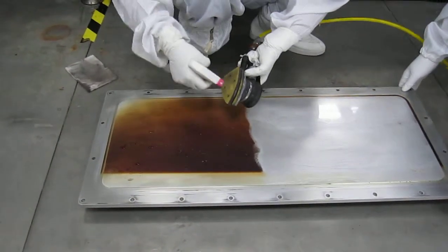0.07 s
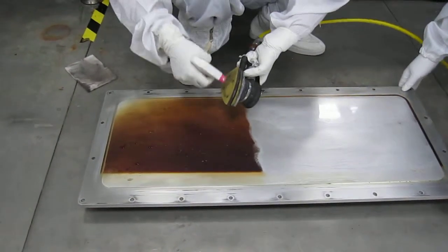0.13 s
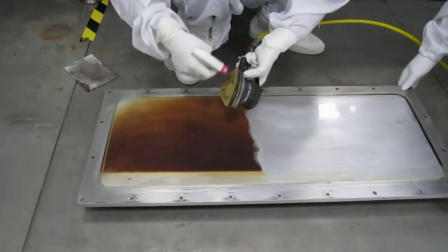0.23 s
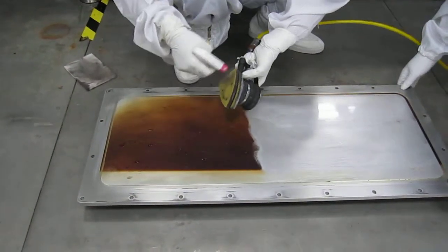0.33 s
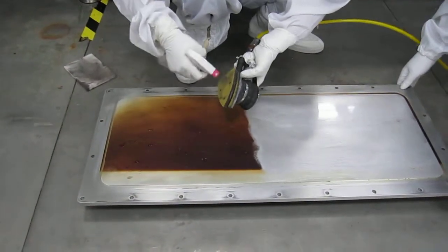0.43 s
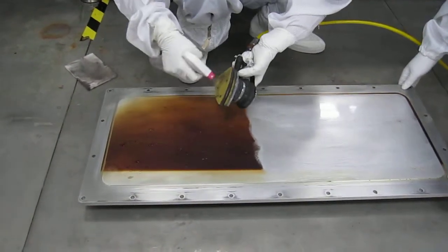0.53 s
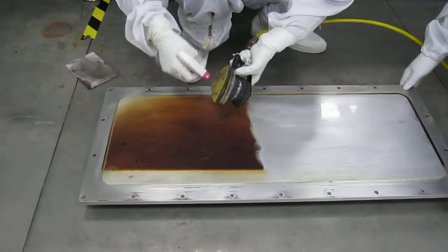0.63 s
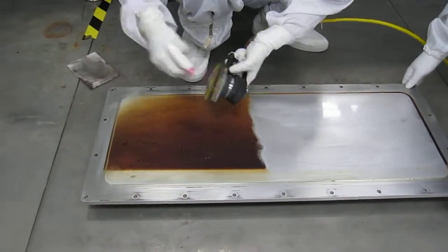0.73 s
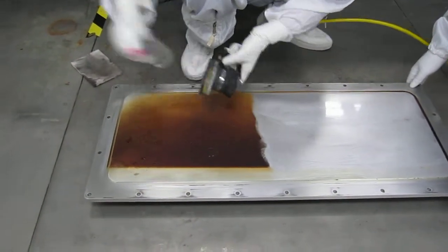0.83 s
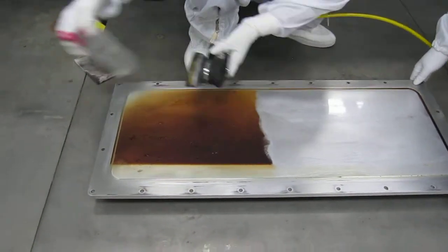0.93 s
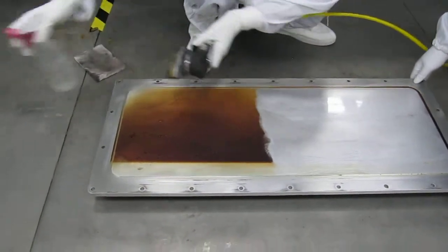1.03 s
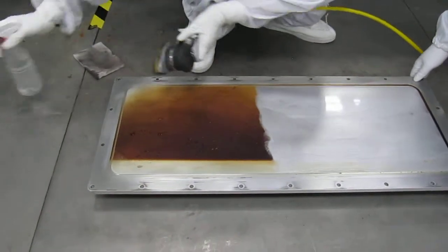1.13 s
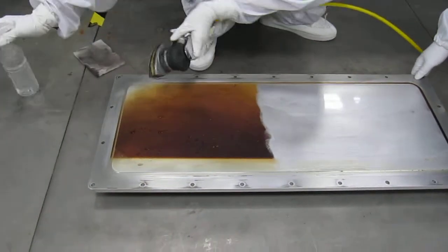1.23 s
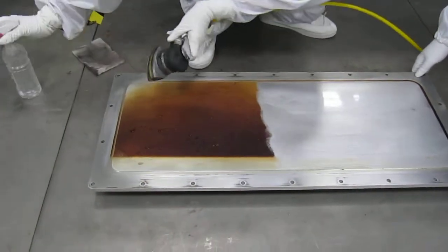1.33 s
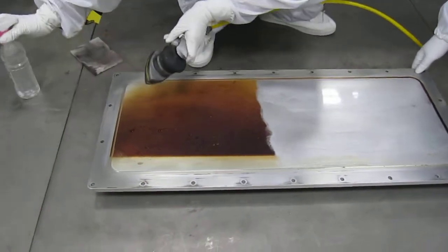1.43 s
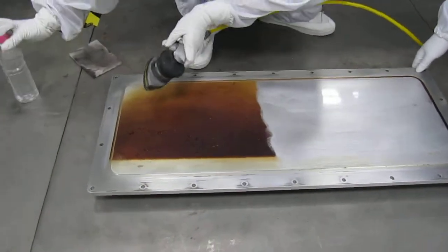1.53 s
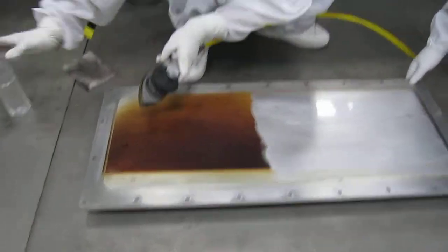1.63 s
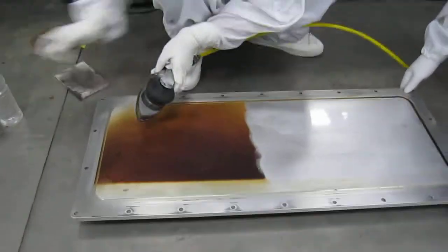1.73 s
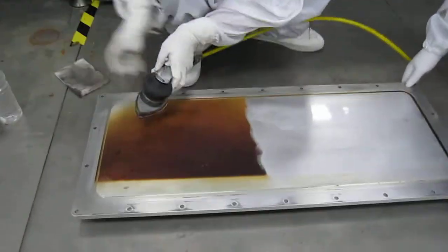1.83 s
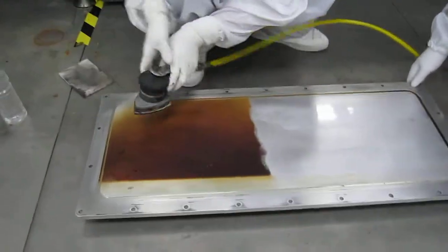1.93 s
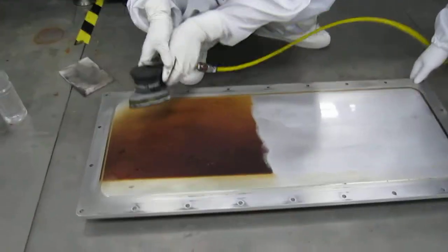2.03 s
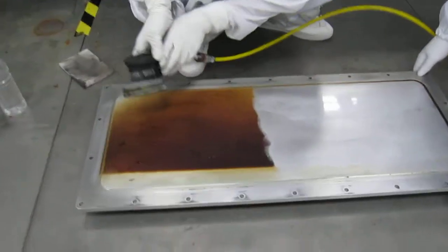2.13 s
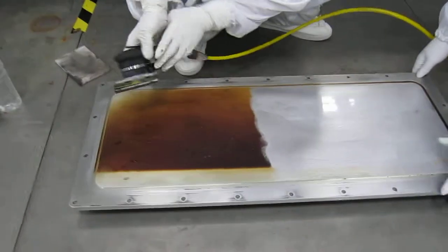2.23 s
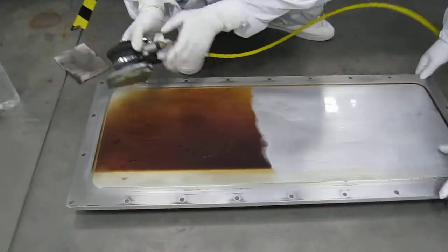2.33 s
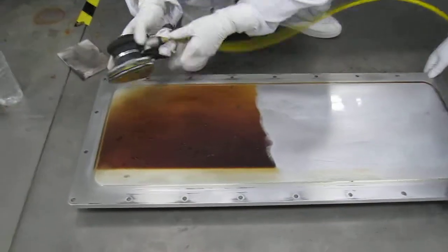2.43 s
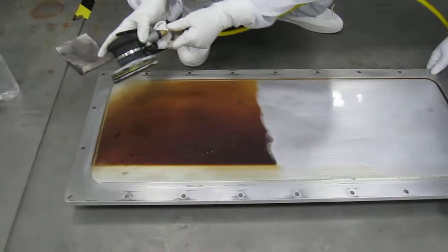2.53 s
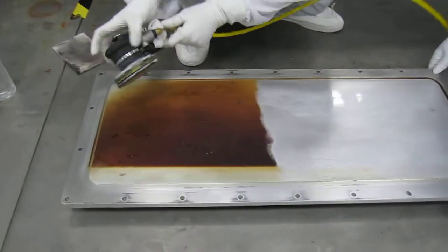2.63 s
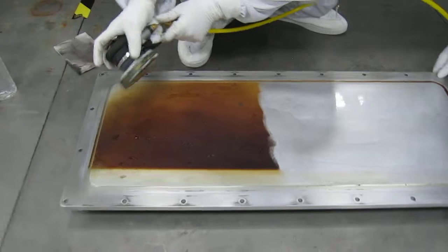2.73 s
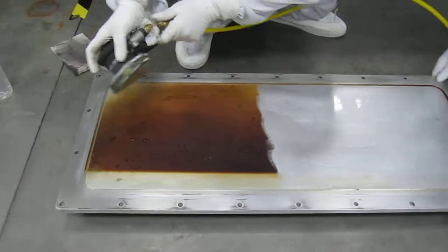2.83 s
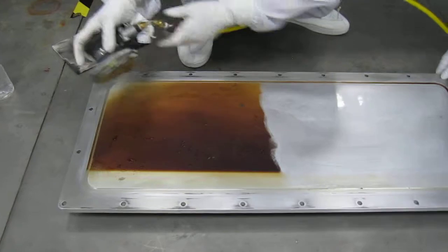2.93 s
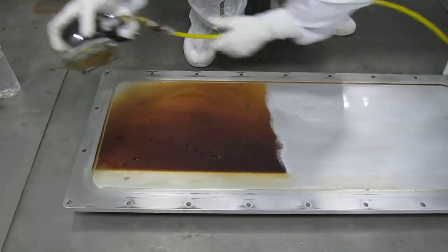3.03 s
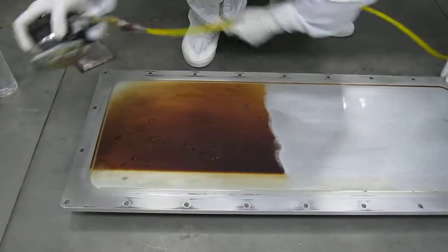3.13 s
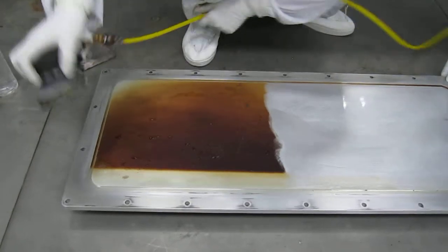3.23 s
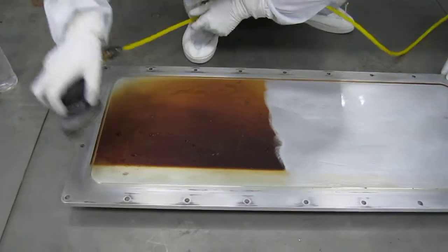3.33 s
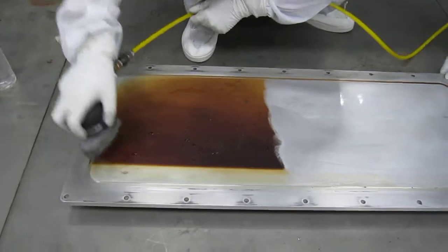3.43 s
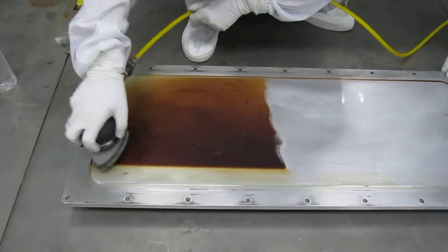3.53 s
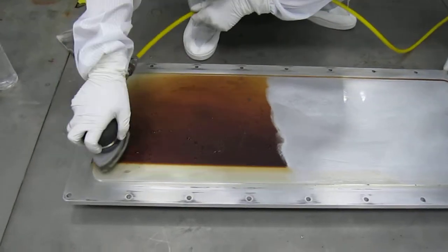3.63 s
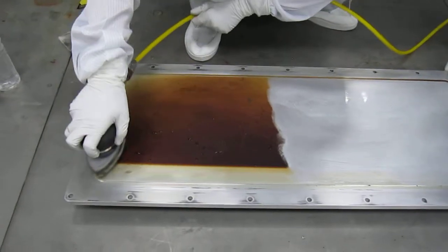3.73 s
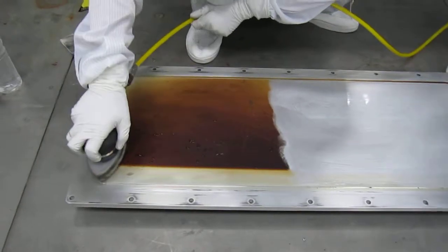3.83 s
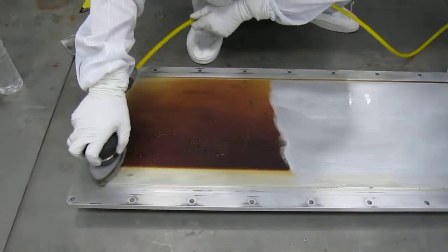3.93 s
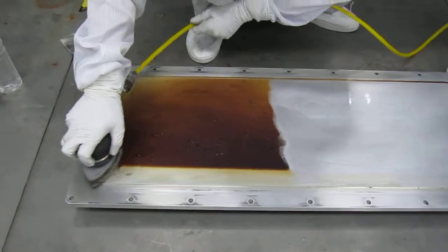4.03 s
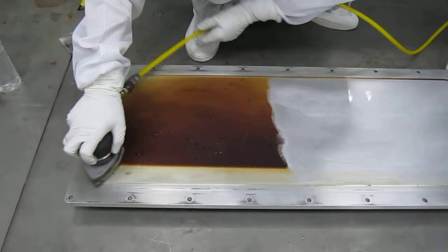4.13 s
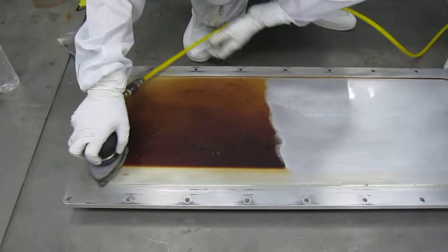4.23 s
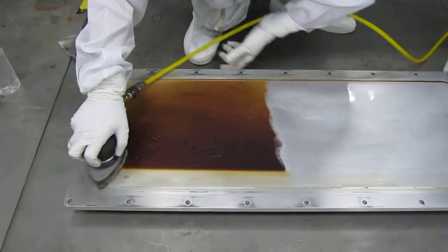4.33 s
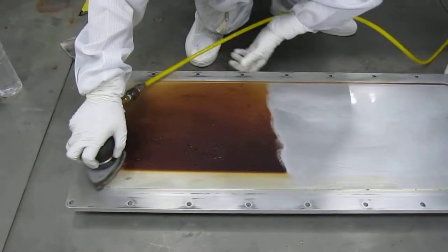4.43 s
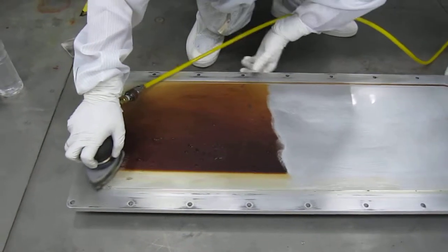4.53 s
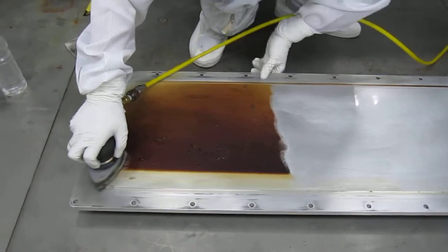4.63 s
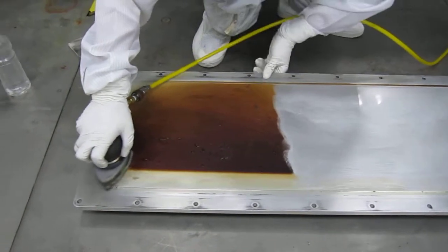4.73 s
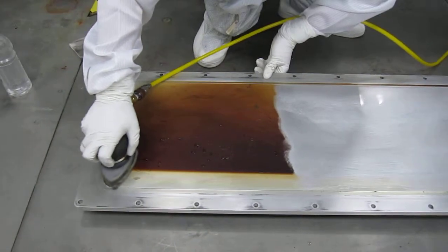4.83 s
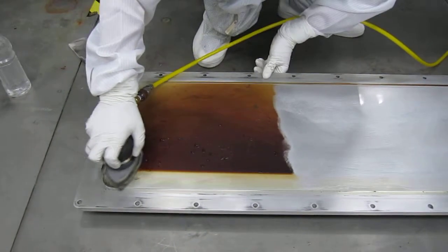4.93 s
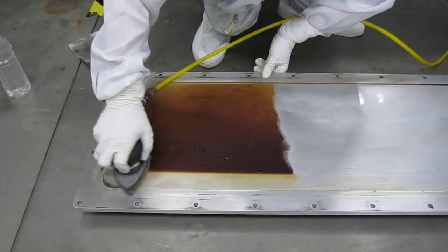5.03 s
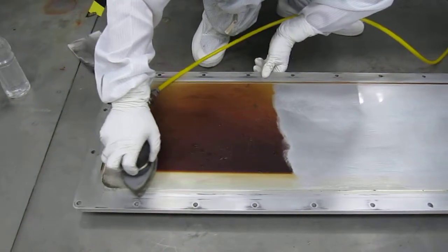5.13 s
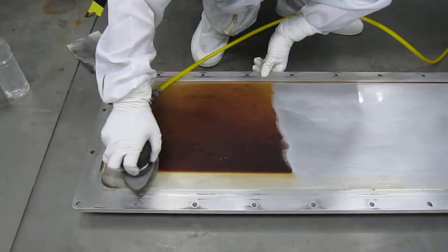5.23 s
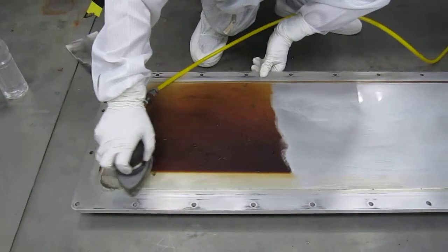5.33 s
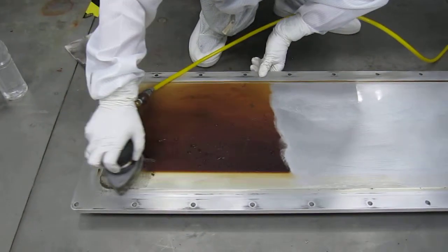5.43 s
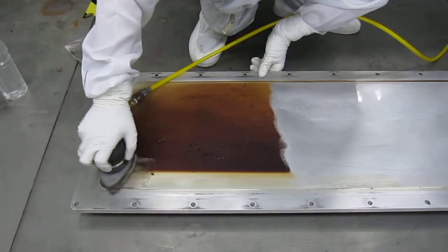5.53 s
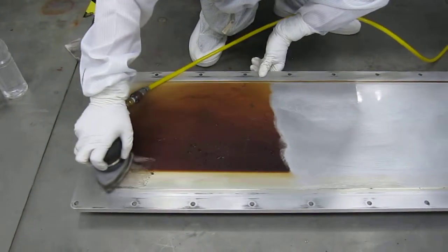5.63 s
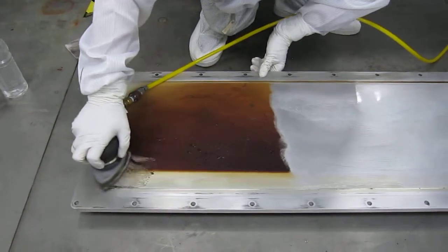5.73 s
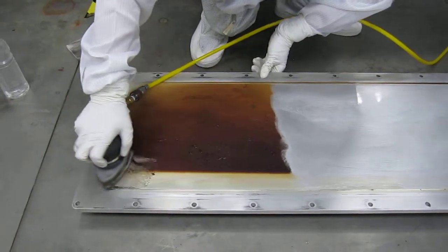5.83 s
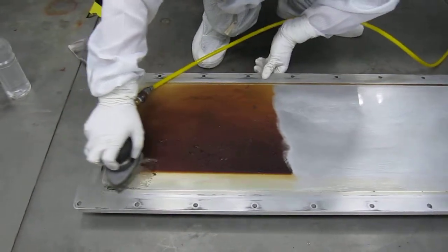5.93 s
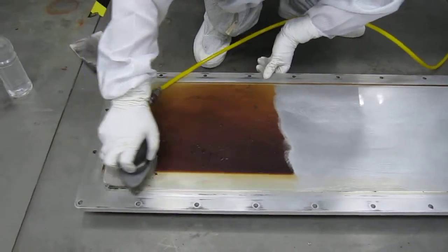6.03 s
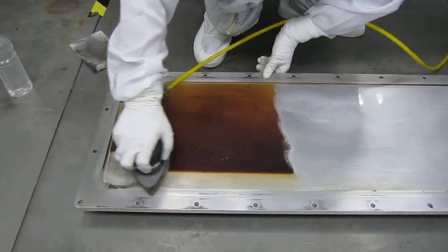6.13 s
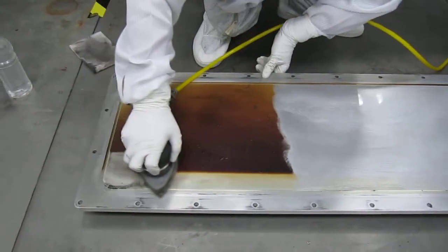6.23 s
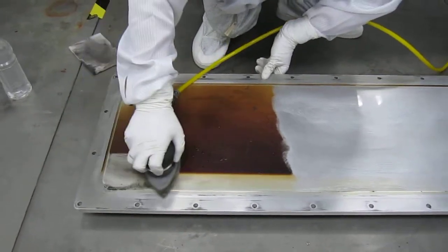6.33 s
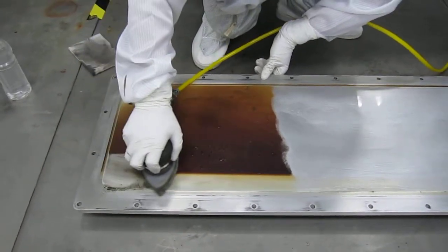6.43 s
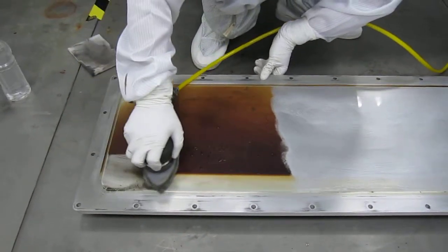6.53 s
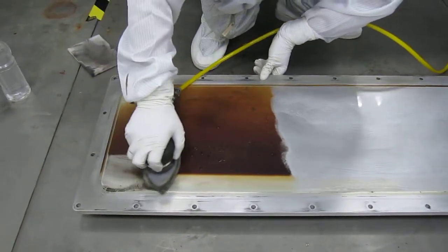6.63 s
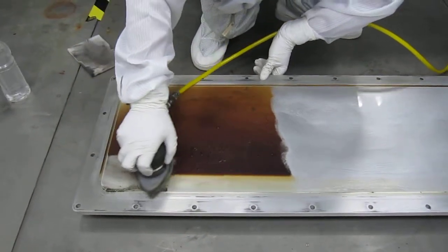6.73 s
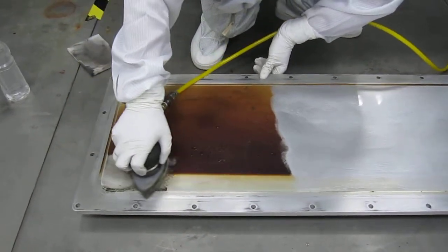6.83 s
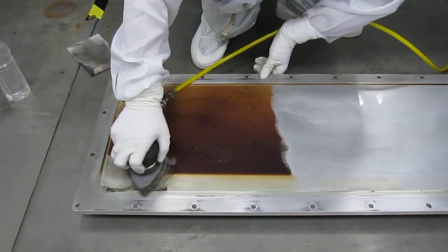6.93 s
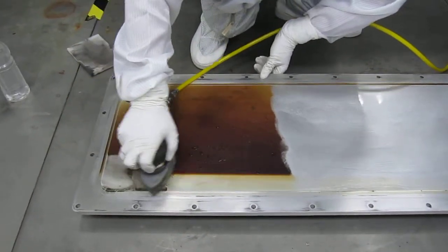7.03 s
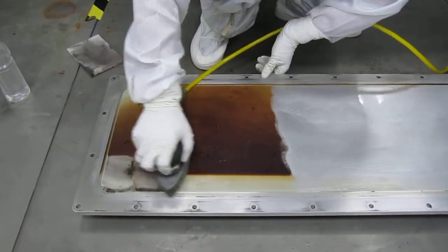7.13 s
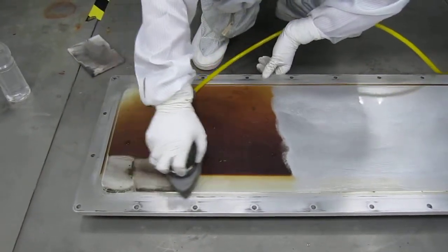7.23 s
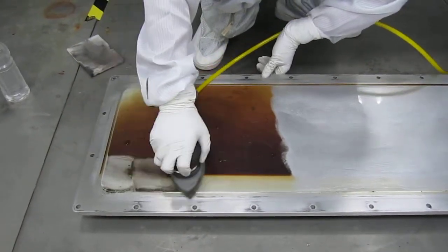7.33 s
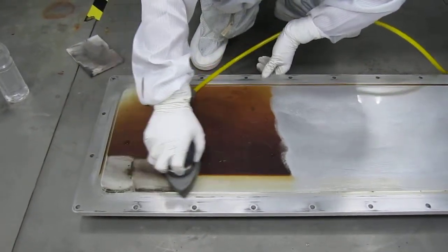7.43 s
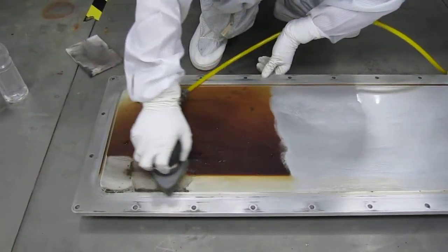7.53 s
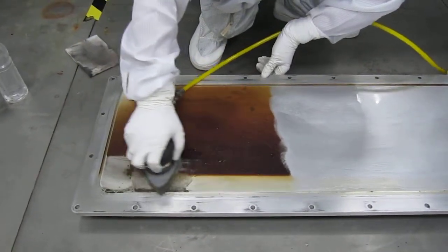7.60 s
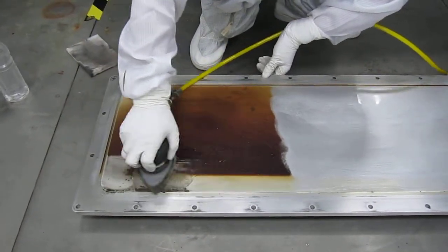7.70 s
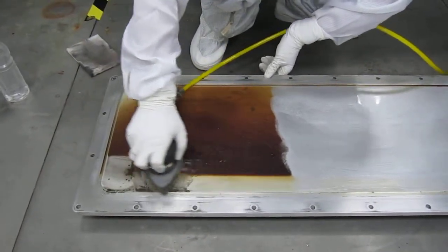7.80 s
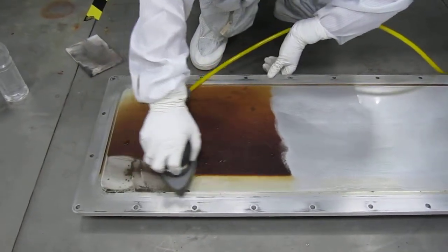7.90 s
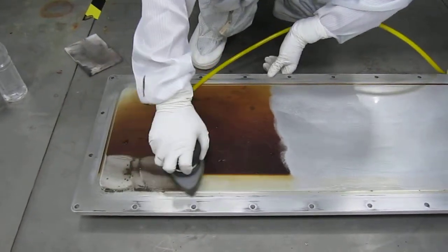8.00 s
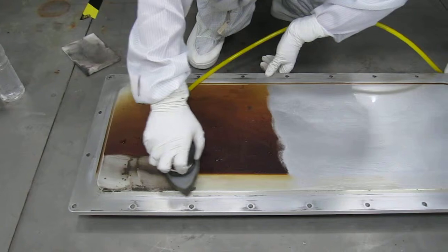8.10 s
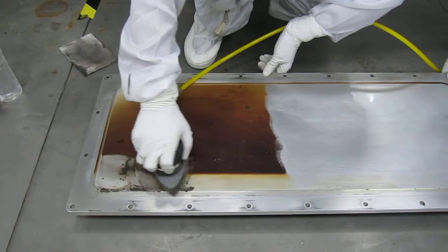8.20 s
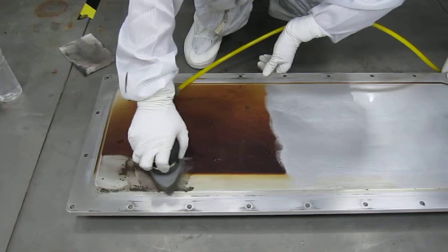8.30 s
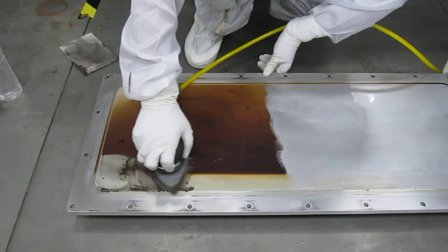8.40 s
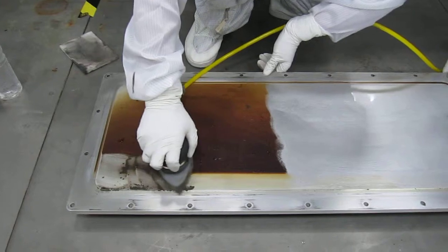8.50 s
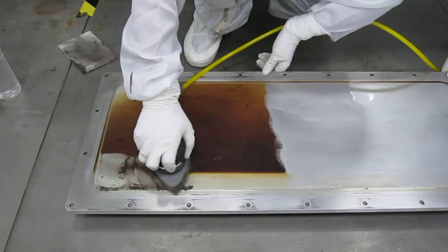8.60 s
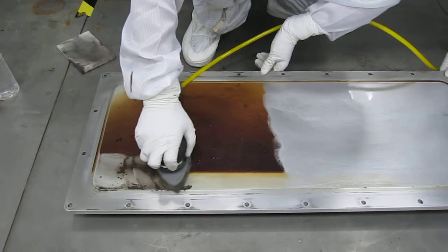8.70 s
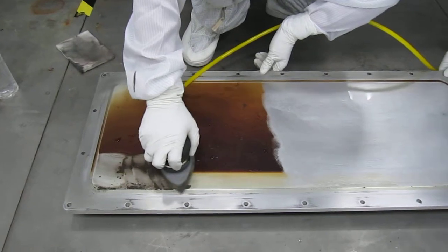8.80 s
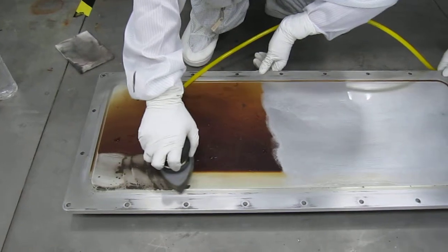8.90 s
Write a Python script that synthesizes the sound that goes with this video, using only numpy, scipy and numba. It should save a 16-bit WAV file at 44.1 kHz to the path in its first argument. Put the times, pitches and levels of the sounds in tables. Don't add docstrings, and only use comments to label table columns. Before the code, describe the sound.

Quick spray-bottle squirts and suit rustling over ventilation hum, a clattering bottle, then a sharp valve crack and a loud, hissing pneumatic sander whine on a metal panel.

```python
import sys
import numpy as np
from scipy import signal
from scipy.fft import rfft, irfft
from scipy.io import wavfile
from scipy.ndimage import uniform_filter1d
from numba import njit

SR = 44100
rng = np.random.default_rng(int(sys.argv[2]) if len(sys.argv) > 2 else 0)


def to_wav(sig):
    pcm = np.clip(np.atleast_2d(sig), -1, 1) * 32767
    pcm = np.round(pcm).astype(np.int16)
    wavfile.write(sys.argv[1], SR, pcm.T)


def how_loud(loudness_db):
    steps = np.asarray(loudness_db, float) / 20
    return 10 ** steps


N = 395136
TIME = np.arange(N) / SR


def level(x, db):
    return x * how_loud(db) / np.sqrt(np.mean(x ** 2))


def noise(grain_db=0.):
    grains = how_loud(grain_db * np.minimum(rng.exponential(size=N), 5))
    return level(rng.standard_normal(N) * grains, 0)


def walk(rate):
    k = int(SR / rate)
    steps = np.repeat(rng.standard_normal(N // k + 1), k)
    return 1.7 * uniform_filter1d(uniform_filter1d(steps, k), k)[:N]


def curves(table):
    s, *columns = np.transpose(table)
    is_open = (TIME > s[0] - .01) & (TIME < s[-1] + .01)
    gate = uniform_filter1d(1. * is_open, size=400, mode="nearest")
    return [np.interp(TIME, s, c) for c in columns] + [gate]


def bump(s, half):
    return np.exp(-((TIME - s) / half) ** 2)


def bumps(rows):
    return sum(db * bump(s, half) for s, db, half in rows)


def peaks(rows, rise, fall, round_s=0.0035):
    swells = []
    for (s, db), up in zip(rows, np.broadcast_to(rise, len(rows))):
        away = np.hypot(TIME - s, round_s) - round_s
        swells.append(db - np.where(TIME < s, up, fall) * away)
    return np.max(swells, axis=0)


def colour(x, points, slope_db=-30):
    hz, db = np.transpose(points)
    octave = np.log2(np.arange(N // 2 + 1) * SR / N + 1)
    outside = np.maximum(np.log2(hz[0]) - octave, 0) + np.maximum(octave - np.log2(hz[-1]), 0)
    gain_db = np.interp(octave, np.log2(hz), db) + slope_db * outside
    return level(irfft(rfft(x) * how_loud(gain_db), N), 0)


@njit
def svf(x, hz, width):
    y, b, l = np.empty(len(x)), 0., 0.
    for i in range(len(x)):
        g, k = np.tan(np.pi * hz[i] / SR), width / hz[i]
        v = (b + g * (x[i] - l)) / (1 + g * (g + k))
        b, l, y[i] = 2 * v - b, l + 2 * g * v, k * v
    return y


def patches(x, rows):
    return sum(how_loud(db) * bump(s, half) * svf(x, np.full(N, 1. * hz), 1. * width)
               for s, hz, width, db, half in rows)


# f/Hz, level/dB
HALL = [(88, -3), (150, -5.5), (285, 2), (332, 2), (607, -2), (668, -1), (736, -1), (2600, -7.5),
        (11400, -17.5), (15500, -25)]
# f/Hz, level/dB, start t/s
FANS = [
    (59, -65.5, 0.66),
    (135, -57, 0.9),
    (203, -64, -1),
    (334.5, -58.5, 0.3),
    (670, -59.5, 1.9),
]
HALL_DB, HALL_START_DB, HALL_FADE_S = -47, 4, 0.9
START_S = 3.2
DUCK_DB, DUCK_S = -2.5, 0.58
RUMBLE_DB, RUMBLE_DUCK_DB, RUMBLE_BACK_DB_PER_S = -54, -17, 0.5
JOLT_DB, JOLT_S = 16, .06


def hall():
    since = TIME - START_S
    duck_db = DUCK_DB * (1 - np.exp(-(np.maximum(since, 0) / DUCK_S) ** 2))
    fade_db = HALL_START_DB * np.exp(-TIME / HALL_FADE_S)

    bands = sum(how_loud(1.76 * walk(6)) * svf(noise(), np.full(N, hz), hz * 1.07)
                for hz in 30 * 2. ** np.arange(10))
    fans = 0
    for hz, db, s in FANS:
        hum = np.sin(2 * np.pi * hz * TIME + 1.13 * walk(5))
        fans = fans + (TIME > s) * np.sqrt(2) * how_loud(db + 1.0 * walk(5.2)) * hum
    fans = fans * np.clip((3.6 - TIME) / 0.27, .25, 1)

    pushed_db = RUMBLE_DUCK_DB + RUMBLE_BACK_DB_PER_S * np.maximum(TIME - 6, 0)
    pushed_db = pushed_db + 8 * np.exp((TIME - 8.96) / .1)
    rumble_db = RUMBLE_DB + fade_db + np.clip(since / 0.11, 0, 1) * pushed_db
    rumble_db = rumble_db + JOLT_DB * bump(3.22, JOLT_S)
    rumble = colour(noise(), [(25, -9), (60, -13), (110, 1), (170, -11)], slope_db=-3)
    rumble = rumble * how_loud(rumble_db + 1.5 * walk(19))

    vents = level(colour(bands, HALL, slope_db=-7), HALL_DB)
    return (vents + fans) * how_loud(fade_db + duck_db) + rumble


# t/s, crisp level/dB, dull level/dB, build-up t/s
RUSTLE = [(.21, -56, -40.5, 0.23), (.97, -52, -54, .03), (1.2, -42.5, -48, 0.62), (1.36, -59, -52, .2),
          (1.56, -60, -63, .4), (1.706, -55, -43, 0.1), (2.11, -49.5, -50.5, 1.6),
          (2.148, -43.5, -49, 0.11), (2.295, -47, -60, 0.27), (2.36, -57, -60, .06),
          (2.51, -50.5, -64, 0.13), (2.605, -47, -48, 0.06), (2.745, -52, -50, .12),
          (2.815, -55, -62, .021), (2.93, -45, -62, 0.067)]
# f/Hz, level/dB
CLOTH = [(1290, -24), (2200, -11), (2510, -3.5), (6410, -9.5), (7310, -10), (11700, -11), (15500, -19)]


def rustle():
    s, crisp_db, dull_db, build = np.transpose(RUSTLE)
    rise, fall = 20 / np.maximum(build, .01), 103
    crisp_db = peaks(np.c_[s, crisp_db], rise, fall)
    dull_db = peaks(np.c_[s, dull_db], rise, fall)
    crisp = colour(noise(2.4), CLOTH)
    dull = colour(noise(4.8), [(700, 6.5), (1400, 9.8), (2500, 4.7)], slope_db=-7.5)
    return crisp * how_loud(crisp_db + 1.0 * walk(80)) + dull * how_loud(dull_db + 0.7 * walk(36.5))


# t/s of fullest flow, mist level/dB, nozzle whistle f/Hz, t/s to fall 10 dB
SPRAY = [
    (.105, -32, 5300, 0.05),
    (.378, -35, 5950, 0.05),
    (.583, -33, 6140, 0.042),
    (.71, -45.5, 6500, 0.05),
]
# f/Hz, level/dB
MIST = [(880, -42), (1500, -21), (1810, -1), (2440, -10), (3030, 1.5), (3380, -8), (3830, -2), (6130, -3),
        (7980, -8.5), (10600, -5), (15500, -9)]
# t/s, f/Hz, width f/Hz, level/dB, half length t/s
EDGE = [
    (.11, 5200, 200, 3, .05),
    (.1, 6300, 300, -1, .04),
    (0.36, 6150, 400, -2, 0.03),
    (.58, 6130, 350, 7, 0.046),
    (.58, 3880, 300, -3, .04),
    (0.58, 2900, 250, -6, .03),
    (0.09, 10700, 700, 1, .05),
    (.11, 12100, 400, -3, .05),
    (.11, 13700, 400, -6, .04),
    (.575, 11000, 1200, -6, .04),
]
DRIP_DB, LET_GO_S = -62, 0.72
SQUEEZE_DB, SQUEEZE_DB_PER_S = -44.5, 0.5


def spray():
    s, _, hz, _ = np.transpose(SPRAY)
    whistle_hz = np.interp(TIME, s, hz)
    released = np.maximum(TIME - LET_GO_S, 0)
    pulls = [top_db - 10 * np.abs((TIME - t) / fall / 1.14) ** 1.9 for t, top_db, _, fall in SPRAY]
    mist_db = np.max(pulls + [DRIP_DB - 100 * released], axis=0)

    mist = colour(noise(2.6), MIST)
    whistling = level(mist + 0.5 * svf(mist, whistle_hz, 650.), 0)
    mist = how_loud(mist_db + 0.88 * walk(71.0)) * (whistling + patches(mist, EDGE))

    squeeze_db = SQUEEZE_DB + SQUEEZE_DB_PER_S * TIME - 150 * released
    squeeze = colour(noise(1.9), [(700, -0.96), (1300, 1.5), (2400, -2.5)], slope_db=-4.5)
    return mist + squeeze * how_loud(squeeze_db + 1.7 * walk(41.3))


# t/s, peak level/dB, ring f/Hz, ring t/s
KNOCKS = [(0.18, -19.5, 840, 0.011), (0.17, -32, 240, .04), (0.2, -31, 240, .035), (.208, -31, 2350, .012),
          (1.346, -33, 1105, .04), (1.379, -36, 1100, .05), (1.387, -36, 1110, .06),
          (1.397, -37, 1900, .02), (1.331, -28, 2030, .02), (1.3705, -28, 1730, .03),
          (.6115, -27.5, 900, 0.029), (0.93, -12.5, 1110, 0.0056), (2.7, -40, 1620, .04),
          (2.822, -36, 2200, .04), (2.945, -40, 1360, 0.027), (2.9631, -29, 2745, 0.066),
          (2.9825, -28, 2755, .051), (2.985, -28.5, 1110, .04), (3.1457, -8, 1380, 0.013),
          (3.1605, -10, 1480, 0.012), (3.1605, -16, 2100, .012), (3.223, -11.5, 1300, 0.022),
          (3.222, -21, 760, .06), (3.298, -30, 780, .08), (3.311, -26, 805, .08)]
# f/Hz, level/dB, ring t/s
BOTTLE = [(140, -26, 0.04), (450, -18, .03), (587, 1, 0.033), (1105, -8, 0.06), (1480, -5, .03),
          (1740, -2, 0.03), (2050, -4, .03)]
# t/s, level/dB, hardness level/dB per octave
WOBBLE = [(1.328, -37, 6), (1.334, -27, -7), (1.342, -46, 7), (1.354, -33, -8), (1.369, -45, 6),
          (1.3755, -31, -8), (1.387, -36, -8), (1.402, -30, -5), (1.41, -36, -8), (1.425, -40, -5),
          (1.439, -36, -7)]


def knocks():
    blows = list(map(tuple, KNOCKS))
    for s, db, hard in WOBBLE:
        for hz, mode_db, t60 in BOTTLE:
            late = 0.002 * rng.random()
            blows.append((s + late, db + mode_db + hard * np.log2(hz / 600), hz, t60))

    out, t = np.zeros(N), np.arange(SR // 8) / SR
    for s, db, hz, t60 in blows:
        ring = np.sin(2 * np.pi * hz * t) + 0.24 * np.sin(2 * np.pi * hz * 1.12 * t)
        fade = np.exp(-np.log(1000) * t / t60)
        i = int(s * SR)
        out[i:i + len(t)] += how_loud(db) * ring * fade * np.minimum(t * hz, 1)
    return out


# t/s, peak level/dB, low f/Hz, high
# f/Hz, burst t/s
TICKS = [(0.2045, -27, 3500, 11000, 0.0022), (.352, -28, 3000, 6500, .001), (.7, -44, 15000, 15700, .04),
         (3.2178, -4.5, 900, 6000, .0005), (0.9323, -10, 395, 4220, 0.00013),
         (0.935, -23.5, 1300, 5000, 0.017), (.701, -35, 6340, 6840, 0.04), (.76, -51, 6300, 6850, 0.043),
         (.9478, -26, 1800, 5500, .0002), (1.327, -21.5, 1200, 2390, 0.00056),
         (1.575, -36, 500, 5000, .002), (1.609, -38, 302, 2500, 0.0018), (2.128, -33, 3400, 5800, .02),
         (1.993, -31, 2500, 15000, 0.004), (2.327, -33, 2500, 5600, .004), (2.356, -38, 8000, 13000, .003),
         (2.435, -40, 1600, 3200, .005), (2.5974, -34, 1500, 4500, .01), (2.604, -30.5, 1500, 12000, .006),
         (2.6472, -32, 3600, 15000, .003), (2.6465, -35, 1700, 2600, 0.0027),
         (2.716, -35, 1400, 3000, .025), (2.8166, -33, 2600, 5400, .0011), (2.9221, -39, 6100, 8400, .007),
         (2.817, -23, 1210, 2680, 0.0023), (2.817, -39, 6500, 8000, 0.0018)]
# t/s, peak level/dB, low f/Hz, high f/Hz,
# burst t/s
POPS = [(2.9621, -23.5, 2450, 5800, 0.029), (2.9781, -27, 2550, 10400, .0081),
        (2.9851, -24.5, 2550, 5600, 0.0121), (3.04, -29, 2000, 5200, 0.015),
        (3.1455, -24, 2000, 14100, .0015), (3.147, -28, 100, 900, 0.015), (3.16, -24, 1900, 9000, .004),
        (3.177, -27, 8000, 15000, .003), (3.206, -21, 4400, 9500, .012), (3.226, -24, 5000, 14000, .012),
        (3.2195, -7.5, 1000, 12000, 0.0028), (3.223, -13, 1100, 9000, 0.0022),
        (3.213, -22.5, 78, 380, 0.0093), (3.237, -7, 2900, 13000, 0.0035),
        (3.2445, -3.5, 3400, 12000, 0.0033), (3.237, -26, 85, 960, 0.004), (3.243, -15, 1230, 2050, .006),
        (3.238, -26, 87, 320, 0.009), (3.285, -32, 60, 700, .02), (3.2754, -12, 3500, 12600, 0.005),
        (3.293, -11, 4000, 13000, .004), (3.306, -17, 4000, 12500, .005)]


def cracks():
    out, t = np.zeros(N), np.arange(SR // 10) / SR
    air_rise = 1 - np.exp(-t / 0.00077)
    for rows, start in [(TICKS, 1.), (POPS, air_rise)]:
        for s, db, low_hz, high_hz, burst in rows:
            splinters = rng.standard_normal(len(t)) * np.exp(-t / burst)
            hit = (splinters + 2.5 * (t == 0)) * start
            band = signal.butter(4, [low_hz, high_hz], "band", fs=SR, output="sos")
            body = signal.sosfilt(band, hit)
            i = int(s * SR)
            out[i:i + len(t)] += how_loud(db) * body / np.abs(body).max()
    return out


# t/s, leak level/dB, whistle f/Hz
VALVE = [(2.95, -49, 1200), (3.058, -45, 1340), (3.078, -36, 1400), (3.1, -30, 1430), (3.135, -25, 1430),
         (3.152, -26, 1480), (3.165, -26.5, 1440), (3.185, -24.5, 1340), (3.195, -29, 1500),
         (3.214, -26, 1650), (3.222, -23, 1740), (3.25, -33, 1810), (3.29, -39, 1880), (3.37, -37, 1950)]
UPPER_HZ, UPPER_PULL, UPPER_DB = 4020, 0.42, -7
TOP_DB, TOP_SHARE = -37, 0.19


def leak():
    low_db, low_hz, on = curves(VALVE)
    high_hz = UPPER_HZ + UPPER_PULL * (low_hz - 1400)
    high_db = low_db + .4 * np.minimum(low_db + 24, 0) + UPPER_DB + 5 * (TIME > 3.214)
    top_db = TOP_DB + TOP_SHARE * (low_db + 23)

    low = svf(svf(svf(noise(1.0), low_hz, 620.0), low_hz, 600.), low_hz, 600.)
    high = svf(svf(noise(1.2), high_hz, 1100.), high_hz, 1100.)
    top = colour(noise(1.8), [(5500, 5), (15500, -4.5)], slope_db=-0.5)
    body_hz = np.full(N, 800.)
    low = low + 0.34 * svf(svf(noise(1.5), body_hz, 200.), body_hz, 200.)
    low = level(low, 0) * how_loud(low_db + 2.5 * walk(150))
    high = level(high, 0) * how_loud(high_db + 1.7 * walk(150))
    return on * (low + high + top * how_loud(top_db))


# t/s, vane rate f/Hz, vane tone level/dB
SPEED = [(3.46, 679.3, -23.5), (3.59, 643, -26), (3.7, 694.5, -28.5), (3.85, 715.7, -24), (4.05, 697, -29),
         (4.46, 710.7, -23.5), (4.6, 696, -28.5), (4.89, 687.5, -30), (5.14, 715.4, -21.5),
         (5.33, 711.4, -21.5), (5.93, 680.7, -29.5), (6.3, 718.7, -22), (6.57, 719.3, -21),
         (7.07, 708, -22), (7.38, 722.6, -20.5), (7.88, 701.7, -22), (8.07, 714.2, -20.5), (8.96, 709, -21)]
SPIN_HZ_PER_S, SPIN_KNEE = 3600, 8
INERTIA_S = 0.13


def rotor():
    ramp = np.maximum(SPIN_HZ_PER_S * (TIME - START_S), 1)
    running = uniform_filter1d(curves(SPEED)[0], int(INERTIA_S * SR), mode="nearest")
    return ramp / (1 + (ramp / running) ** SPIN_KNEE) ** (1 / SPIN_KNEE)


# multiple of the turn rate, level/dB below the vane tone early, midway, late
SHAFT = [(2, -30.5, -36, -40.5), (3, -36, -34.5, -29.5), (4, -27.5, -27, -26.5), (7, -28, -27, -29),
         (8, -23, -26, -33), (9, -28, -24, -22), (11, -32, -25, -22), (13, -23, -25, -23),
         (15, -25, -24, -28), (17, -23, -34, -28), (20, -30, -27, -17.5), (24, -28, -30, -17.5),
         (26, -26, -30, -32), (30, -32, -23, -25), (31, -32, -28, -26), (32, -28, -28, -21),
         (33, -28, -23, -43), (35, -22, -27, -24)]
# t/s, level/dB, half width t/s
NULLS = [(3.245, -18, 0.016), (3.268, 7, .008), (3.283, -4, .005), (3.317, -10, 0.01), (3.34, 5, .008),
         (3.354, -9, .005), (3.43, -13, 0.009), (3.522, -14, 0.0081), (3.68, 6, 0.018), (3.71, -10, 0.0073),
         (3.785, -8, 0.014), (4.01, -6.5, 0.042), (4.34, -4.5, .02), (4.555, -8.5, 0.033), (4.84, 3, 0.087),
         (4.96, -3, 0.043), (5.52, -9.5, 0.055), (5.56, -11, .01), (5.6, -11.5, 0.037), (5.675, -5, .015),
         (5.85, 3.5, .04), (5.97, 3.5, 0.064), (6.06, -3, 0.048), (6.67, -1.5, .06), (6.8, 1.5, 0.039),
         (7.12, -1.5, .03), (7.71, -2, 0.027), (7.79, -2, .02), (7.9, -3.5, 0.043), (8.83, -0.5, .03)]
# t/s, level/dB, half width t/s
CALMS = [
    (4.76, -5, 0.07),
    (5.0, -5, .05),
    (5.78, -5, 0.088),
    (6.1, -2, 0.057),
]
TRAVEL_S = [3.84, 5.55, 8.75]
VANES = 5
SLOW_DB = -19
OCTAVE_DB, OCTAVE_FACING = -31.5, 0.69
SHAFT_DB, SHAFT_DB_PER_HZ, CRUISE_HZ = -44, 0.2, 711.5


def motor(vane_hz, turns):
    def tone(k, db):
        jitter = (0.022 + .22 * (vane_hz < 520)) * walk(60)
        return np.sqrt(2) * how_loud(db) * np.sin(2 * np.pi * k * turns + 6 * rng.random() + jitter)

    run_hz, run_db, _ = curves(SPEED)
    vane_db = run_db + SLOW_DB * (1 - (vane_hz / run_hz) ** 5) + bumps(NULLS)
    octave_db = OCTAVE_DB + OCTAVE_FACING * curves(AIR)[1]
    octave_db = octave_db + 3.1 * np.exp(-((TIME - 3.56) / 0.086) ** 4) - 4 * bump(3.75, .1)
    shaft_db = SHAFT_DB + np.maximum(SHAFT_DB_PER_HZ * (vane_hz - CRUISE_HZ), -4) + bumps(CALMS)

    octave = tone(2 * VANES, octave_db + 1.2 * walk(70)) * np.clip((TIME - 3.43) / .04, 0, 1)
    unbalance = tone(1, shaft_db + 0.5 * walk(21))
    vanes = tone(VANES, vane_db + (0.3 + 3 * (vane_hz < 560)) * walk(60))
    steady_db = -23.5 + 0.55 * (vane_db + 21.5)
    multiples = sum(tone(round(k), steady_db + np.interp(TIME, TRAVEL_S, db) + 0.94 * walk(10))
                    for k, *db in SHAFT)
    on = np.clip((vane_hz - 400) / 200, 0, 1)
    return np.clip((vane_hz - 100) / 100, 0, 1) * vanes + on * (octave + unbalance + multiples)


@njit
def again(x, lag, share):
    y = x.copy()
    for i in range(2000, len(x)):
        k = int(lag[i])
        y[i] += share[i] * (y[i - k] + (lag[i] - k) * (y[i - k - 1] - y[i - k]))
    return y


# t/s, flow level/dB, level/dB for how far the exhaust points at the microphone
AIR = [(3.25, -22.5, -18), (3.27, -28.5, -3), (3.34, -25.5, -9.5), (3.42, -23.5, -5.5), (3.5, -27, 2.5),
       (3.63, -23.5, 0), (3.96, -26, -2), (4.04, -26.5, 2), (4.35, -26.5, -2), (5.05, -25.5, -2),
       (5.14, -28.5, -2.5), (5.41, -27, -3), (5.54, -24.5, -2.5), (5.75, -26, -3.5), (6.06, -26, -1),
       (6.72, -28, 0), (7.21, -27, 0), (7.48, -28.5, 0), (7.77, -26, -0.5), (8.05, -27.5, 0.5),
       (8.96, -28, 0)]
# f/Hz, level/dB
ROAR = [(440, -24.5), (750, -1.5), (904, -6.5), (1080, -6), (1430, -1.5), (1850, -8), (2000, -11.5),
        (2110, -9.5), (2600, -4), (3380, -15.5), (5720, -120)]
# f/Hz, level/dB
JET = [(1120, -60), (1900, 4.5), (1960, -2.5), (2120, -5), (2680, -15), (2890, 0), (3260, -1.5), (3660, -4),
       (3970, -0.5), (4550, 1.5), (7000, -3.5), (9100, -23), (15400, -120)]
# f/Hz, level/dB
SCRUB = [(3820, -22), (6500, -10), (7820, -2.5), (9220, -3.5), (11500, -4.5), (15500, -11)]
# f/Hz, width f/Hz, level/dB early, midway, late
RINGING = [(1247, 155, -3, -3, -12), (1601, 66, -0.5, 8.5, -16), (1770, 27, 0, -2, -16),
           (2127, 81, 6, 7, -14), (2325, 45, 2.5, 9, -34), (2832, 21, 8, -11, 1), (3436, 14, 1, -8, 6),
           (3656, 110, 5.5, 5, -1.5), (4410, 54, -18, -4.5, -8), (5110, 320, -12, -13, 0),
           (11100, 3300, -6, -22, -15),
           (5620, 170, -10, 1, -4), (6650, 100, -13, -14, -15), (7550, 180, 0, -3, -12),
         (8200, 220, -11, -14, -3), (9900, 200, -8, -6, -5), (10800, 220, -9, -8, -12),
         (11820, 300, -6, -3, -1.5)]
# t/s, f/Hz, width f/Hz, level/dB, half length t/s
SINGS = [(3.5, 2330, 90, 6, 0.11), (3.62, 2230, 79.9, 2, .08), (3.655, 3040, 70, 7, .06),
         (3.65, 4180, 90, 4, 0.054), (3.837, 2990, 70, 8, 0.11), (3.93, 3720, 70, 5, 0.12),
         (3.57, 1585, 50, 3, 0.085), (4.0, 1571, 80, 0, 0.11), (4.7, 4400, 70, -5, 0.14),
         (4.95, 5300, 90, 2, .1), (5.35, 1580, 60, 4, 0.056), (5.519, 1530, 60, -1, 0.054),
         (5.558, 4400, 60, -2, 0.087), (5.751, 5600, 90, -10, 0.091), (6.076, 4418, 60, 7, 0.083),
         (6.35, 4470, 60, 0, 0.089), (6.45, 2510, 70, -7, 0.11), (6.6, 3720, 80, 5, 0.14),
         (7.097, 1520, 80, -2, 0.14), (7.7, 4564, 90, 0, 0.16), (7.75, 5000, 90, -6, .2),
         (7.778, 1530, 80, 1, 0.1), (7.85, 2500, 80, 4, 0.12), (8.5, 3433, 40, -8, 0.17),
         (8.701, 4997, 90, -7, 0.28), (3.75, 6500, 200, -2, 0.16), (4.75, 11200, 900, -2, .25),
         (5.65, 11200, 900, -2, .2), (6.151, 12300, 900, -2, .1), (6.33, 2920, 60, -5, .04)]
SCRUB_DB, PAD_DOWN_S, LIFTED_DB = -2, 4, -4.5
MUFFLER_HZ, MUFFLER_SLOW_HZ, JET_HZ = 1492, 1760, 4700
REPEAT_SHARE = 0.41


def air(vane_hz, turns):
    jet_db, facing_db, on = curves(AIR)
    roar_db = jet_db + facing_db
    scrub_db = jet_db + SCRUB_DB + LIFTED_DB * bump(3.62, PAD_DOWN_S - 3.7)
    slow = np.clip((640 - vane_hz) / 100, 0, 1)
    muffler_hz = MUFFLER_HZ + 25 * walk(6) + (MUFFLER_SLOW_HZ - MUFFLER_HZ) * slow
    jet_hz = JET_HZ + 130 * walk(5)
    puff = 1 + 0.27 * np.cos(2 * np.pi * VANES * turns) + 0.02 * np.cos(2 * np.pi * turns)
    flow = how_loud(0.34 * walk(25))

    lag = SR * VANES / np.maximum(vane_hz, 170)
    share = np.clip(REPEAT_SHARE + 0.062 * walk(1.506), 0, .8)

    def turning(grain_db, k):
        return again(noise(grain_db) * puff, lag, k * share) / np.sqrt(1 + share ** 2)

    gas, jet, scrub = turning(.1, 0.47), turning(1.2, 0.59), turning(1.2, .4)
    roar = colour(gas + 0.86 * svf(gas, muffler_hz, 450.0), ROAR) * how_loud(roar_db + 0.13 * walk(9))
    jet = colour(jet + 0.27 * svf(jet, jet_hz, 520.0), JET) * how_loud(jet_db + 0.13 * walk(15))
    scrub = colour(scrub, SCRUB) * how_loud(scrub_db + 0.1 * walk(8.0))
    rush = on * flow * (roar + jet + scrub)

    rings = 0
    for hz, width, *db in RINGING:
        gain = how_loud(np.interp(TIME, TRAVEL_S, db) + 1.5 * walk(2.58))
        rings = rings + gain * svf(rush, hz + 18 * walk(2.11), 1. * width)
    return 0.77 * (rush + rings + patches(rush, SINGS))


ROOM_T60_S, ROOM_DB = 0.44, -11


def scene():
    vane_hz = rotor()
    turns = np.cumsum(vane_hz) / VANES / SR
    near = rustle() + spray() + knocks() + cracks() + leak() + air(vane_hz, turns)
    t = TIME[:SR // 2]
    tail = rng.standard_normal(len(t)) * np.exp(-np.log(1000) * t / ROOM_T60_S) * (t > .008)
    wet = signal.fftconvolve(near, tail / np.sqrt(np.sum(tail ** 2)))[:N]
    return np.tile(hall() + near + how_loud(ROOM_DB) * wet + motor(vane_hz, turns), (2, 1))


def band_limit(x):
    return signal.sosfilt(signal.butter(12, 16170, fs=SR, output="sos"), x)


def record(dry):
    chance = np.repeat(1. * (rng.random(N // 1024 + 1) < .045), 1024)
    split = uniform_filter1d(chance, size=512)[:N]
    treble = signal.sosfilt(signal.butter(12, 3800, "high", fs=SR, output="sos"), dry[0])
    pair = dry + 0.25 * split * np.roll(treble, 900) * np.array([[1], [-1]])
    rounded = np.tanh(1.3 * pair) / 1.3
    mix = signal.sosfilt(signal.ellip(12, .2, 80, 15720, fs=SR, output="sos"), rounded)
    return band_limit(mix)


dry = scene()
out = record(dry)
to_wav(out)
```